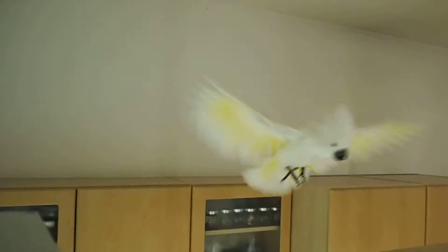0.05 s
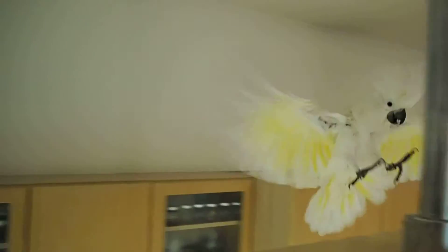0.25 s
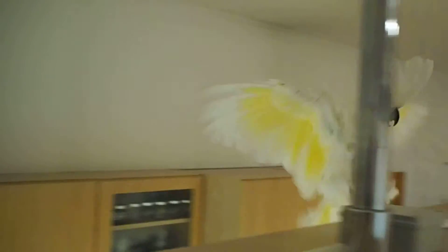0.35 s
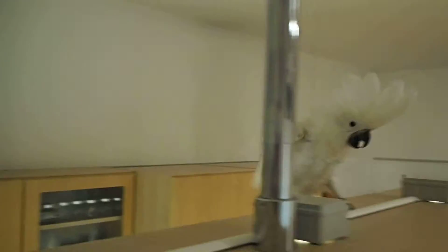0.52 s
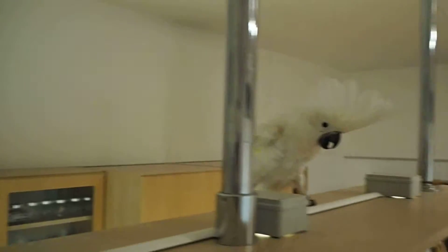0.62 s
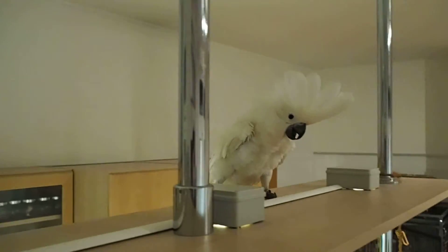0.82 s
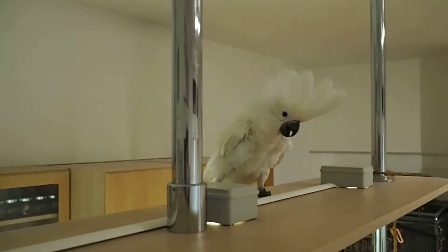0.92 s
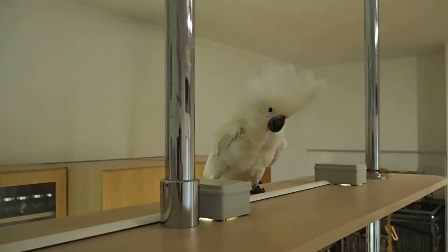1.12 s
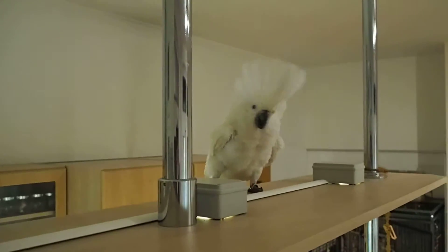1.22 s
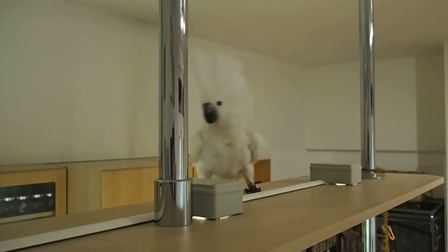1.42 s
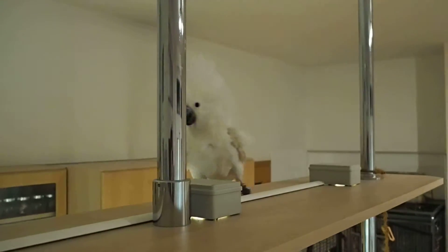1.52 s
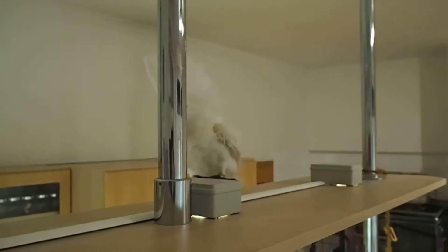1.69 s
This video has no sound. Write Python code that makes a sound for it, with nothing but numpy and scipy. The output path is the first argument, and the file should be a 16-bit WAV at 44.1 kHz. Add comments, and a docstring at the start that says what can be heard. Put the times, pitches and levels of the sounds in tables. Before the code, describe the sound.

A large parrot flaps and lands on a wooden shelf with a sharp clack, then shuffles.

```python
"""In a bare room, a large parrot brakes with a few wingbeats and lands on a wooden shelf close by.
Its wings swish and push puffs of air, its feet thud, and its clattering claws make the wood ring.
It then shuffles along the board, with soft steps and brushing feathers.
The room echoes over a quiet background hush; the camera's gain control turns the landing down."""
import sys
import numpy as np
from scipy import signal
from scipy.fft import rfft, irfft, next_fast_len
from scipy.io import wavfile
from scipy.ndimage import map_coordinates

SR = 44100
rng = np.random.default_rng(int(sys.argv[2]) if len(sys.argv) > 2 else 0)


def wav_record(signal):
    """Record a signal, one row per channel, as 16-bit PCM in the file named by sys.argv[1]."""
    frames = np.transpose(np.atleast_2d(signal))
    bounded = np.clip(frames, -1, 1)
    # unit amplitude maps onto the largest positive 16-bit level
    quanta = np.round(bounded * 32767).astype(np.int16)
    wavfile.write(sys.argv[1], SR, quanta)


N = 77175
T = np.arange(N) / SR


def amp(db):
    return 10 ** (np.asarray(db) / 20)


def unit(x):
    return x / np.sqrt(np.mean(x ** 2) + 1e-20)


def along(points, hz):
    """Read between (frequency, value) points on a log frequency axis."""
    f, v = np.transpose(points)
    return np.interp(np.log(hz + 1), np.log(f + 1), v)


def filtered(x, response):
    """Scale each frequency in x by response(hz)."""
    size = next_fast_len(N + SR // 2)
    return irfft(rfft(x, size) * response(np.fft.rfftfreq(size, 1 / SR)), size)[..., :N]


def wobble(rate):
    """A wandering curve through `rate` random points a second."""
    return map_coordinates(rng.standard_normal(N), [T * rate], order=1)


def noise(spectrum, alike):
    """Stereo noise of average (rms) size 1; `alike` says how well left and right match."""
    def shape(hz):
        spread = np.arccos(along(alike, hz)) / 2
        return amp(along(spectrum, hz)) * [np.cos(spread), np.sin(spread)]
    mid, side = filtered(rng.standard_normal((2, N)), shape)
    return unit(np.array([mid + side, mid - side]))


def swell(peak, rise, fall):
    """A bell-shaped rise to the peak time, then a fade."""
    return np.exp(-(np.minimum(T - peak, 0) / rise) ** 2 - np.maximum(T - peak, 0) / fall)


def dying(t, fade):
    """Silent before t = 0, then falling 60 dB every `fade` seconds."""
    return (t >= 0) * np.exp(-np.log(1000) * np.maximum(t, 0) / fade)


def snap(gain, size=2048):
    """The most sudden click (minimum phase) with the tone gain(hz) and energy 1."""
    cepstrum = irfft(np.log(np.maximum(gain(np.fft.rfftfreq(size, 1 / SR)), 1e-6)))
    cepstrum[1:size // 2] *= 2
    cepstrum[size // 2 + 1:] = 0
    click = irfft(np.exp(rfft(cepstrum)))
    return click / np.linalg.norm(click)


# tone of the background (frequency [Hz], level [dB])
HUSH_TONE = [(20, -8.5), (60, -5), (110, -3.5), (200, -5), (300, -9), (550, -10.5), (900, -14.5),
             (1400, -20), (2200, -19), (3800, -22), (5500, -26.5), (8000, -24), (11000, -31.5),
             (13500, -35.5), (15500, -42)]
# how well its left and right match (frequency [Hz], likeness [0-1])
HUSH_ALIKE = [(50, 0.68), (500, 0.52), (2000, 0.32), (8000, 0.1)]
def hush():
    """The room's quiet, steady background noise."""
    return amp(-52.5) * noise(HUSH_TONE, HUSH_ALIKE)


# how well left and right match for nearby sounds (frequency [Hz], likeness [0-1])
CLOSE_ALIKE = [(100, 1), (1000, 0.98), (4000, 0.8), (8000, 0.48), (13000, 0.13)]
def rubbing(spectrum, grain_db, clump_db):
    """Feathers or claws rub: fine grains of noise that come in clumps."""
    hiss = noise(spectrum, CLOSE_ALIKE)
    return unit(hiss * amp(grain_db * wobble(2500) + clump_db * wobble(220)))


# wing strokes (peak time [s], swish level [dB], air level [dB], rise [s], fall [s])
WING_STROKES = [(.005, -37.5, -80, .03, 0.021), (0.052, -36.5, -37.5, 0.024, 0.042),
                (0.17, -38.5, -53, 0.044, 0.057), (0.23, -35, -36.5, 0.032, 0.039),
                (.322, -44, -56, 0.024, 0.049)]
# tone of the swishing feathers (frequency [Hz], level [dB])
SWISH_TONE = [(180, -83), (300, -6), (384, -11), (431, -8), (769, -18), (1020, -10), (1370, -15.5),
              (2880, -10), (4880, -13), (8560, -12), (15500, -23.5)]
# tone of the pushed air (frequency [Hz], level [dB])
AIR_TONE = [(20, -19), (65, -12), (110, 0), (200, 0), (450, -6.5), (900, -14.5), (2000, -75)]
def wings():
    """Each stroke swishes and pushes a puff of air; a quill squeaks once."""
    swish = sum(amp(db) * swell(s, rise, fall) for s, db, _, rise, fall in WING_STROKES)
    push = sum(amp(db) * swell(s, rise, fall) for s, _, db, rise, fall in WING_STROKES)
    quill_hz = 3600
    quill = np.sin(2 * np.pi * quill_hz * T + 0.9 * wobble(380))
    squeak = amp(-31) * swell(peak=0.02, rise=0.0026, fall=0.0026) * quill
    feathers = rubbing(SWISH_TONE, grain_db=2.5, clump_db=1.3)
    return swish * feathers + push * noise(AIR_TONE, CLOSE_ALIKE) + squeak


# tone of the echo (frequency [Hz], level [dB])
ECHO_TONE = [(100, -8.5), (260, 0), (400, -6.5), (600, -1), (800, 2), (1200, -6), (1800, -4), (2700, -5.5),
             (3600, -2), (5000, -4.5), (8000, -2.5), (14000, -1.5)]
# how well its left and right match (frequency [Hz], likeness [0-1])
ECHO_ALIKE = [(100, 1), (700, 0.99), (2000, 0.78), (4000, 0.64), (8000, 0.12)]
# how long it lasts (frequency [Hz], time to fade 60 dB [s])
ECHO_FADE = [(100, 0.54), (500, 0.82), (2000, 0.63), (4000, 0.61), (8000, 0.55), (14000, 0.36)]
def echo(x):
    """The bare walls return a wash of sound whose highest notes die first."""
    build_s = 0.0091
    hz, t, bands = signal.stft(noise(ECHO_TONE, ECHO_ALIKE), SR, nperseg=256)
    fading = bands * dying(t, along(ECHO_FADE, hz)[:, None])
    tail = signal.istft(fading, SR, nperseg=256)[1][:, :N]
    tail *= 1 - np.exp(-T / build_s)
    return signal.fftconvolve(x.mean(0)[None], tail / np.linalg.norm(tail[0]), axes=1)[:, :N]


# low thumps (time [s], level [dB], pitch [Hz], rise and fall [s])
LOW_THUMPS = [(0.04, -46, 68.4, 0.025), (0.218, -38.5, 61.4, 0.016), (0.774, -49, 62, .03),
              (1.172, -52, 90, 0.012), (1.261, -50.5, 80.5, 0.021), (1.382, -48, 98, 0.0084)]
def thumps():
    """Moving air and the bird's weight each make a few slow waves of pressure."""
    out = np.zeros(N)
    for s, db, hz, width in LOW_THUMPS:
        t = T - s
        out += amp(db) * np.exp(-(t / width) ** 2) * np.sin(2 * np.pi * (hz * t + rng.random()))
    return out


# tone of the rumbling shelf (frequency [Hz], level [dB])
RUMBLE_TONE = [(20, -29), (55, 1.5), (150, -3), (260, -2), (500, -35)]
def shelf_rumble():
    """The shelving rumbles under the bird's weight."""
    return amp(-43.5) * swell(peak=0.49, rise=0.093, fall=0.23) * noise(RUMBLE_TONE, CLOSE_ALIKE)


# feet meeting the board (time [s], level [dB], pitch [Hz])
FOOTSTEPS = [(.3672, -19.5, 773), (.858, -44, 513), (.979, -40.5, 557), (1.024, -44.5, 1100),
             (1.171, -43, 500), (1.308, -44.5, 1250), (1.429, -47.5, 495)]
def steps():
    """Soft foot pads make a dull knock with a little scuff."""
    fade_cycles, rise_s = 16.3, 0.0021
    out = np.zeros((2, N))
    for s, db, hz in FOOTSTEPS:
        t = T - s
        scuff = noise([(hz / 10, -10), (hz, 0), (hz * 2, -12), (hz * 10, -35)], CLOSE_ALIKE)
        press = dying(t, fade_cycles / hz) * np.clip(t / rise_s, 0, 1)
        out += amp(db) * press * (np.sin(2 * np.pi * hz * t) + amp(-0.5) * scuff)
    return out


# claws striking the board (time [s], level [dB], dulled above [Hz])
CLAW_HITS = [(.3718, -5, 9000), (.3752, -7, 7100), (.379, -3, 4600), (0.3815, -4.5, 8100), (.3859, 4, 3530)]
# notes the shelf rings with (pitch [Hz], level [dB], time to fade 60 dB [s])
SHELF_NOTES = [(430, -13.5, 0.032), (787.5, -13.5, 0.075), (860, -29, 0.025), (980, -23, .04),
               (1048, -13, 0.07), (1530, -18, 0.054), (1780, -23, 0.039), (1897, -7.5, 0.06),
               (1936, -9, 0.068), (2280, -28, 0.11), (2420, -9, 0.069), (2653, -0.5, 0.039),
               (2760, -6.5, 0.085), (3050, -14, .05), (3260, -12.5, 0.085), (3462, -5.5, 0.025),
               (4045, -10.5, 0.033)]
# tone of claw on wood (frequency [Hz], level [dB])
CLAW_TONE = [(100, -26.5), (380, -12), (600, -12), (850, -9), (1350, -13.5), (1800, 2), (2200, -3),
             (2700, 1), (3100, -2), (3600, -3.5), (4200, -4), (5200, -11), (8000, -9), (11000, -14),
             (13000, -23), (15500, -21)]
def claws():
    """The claws hit in quick succession and skid; each blow cracks, rings the shelf and echoes."""
    skid_at_s, skid_width_s, echo_db = 0.380, 0.0084, 2
    slide = np.exp(-((T - skid_at_s) / skid_width_s) ** 4)
    skid = amp(-19) * slide * rubbing(CLAW_TONE, grain_db=3, clump_db=1.5)
    out = skid + amp(echo_db) * echo(skid)
    for s, db, dull_hz in CLAW_HITS:
        t = T - s
        soften = lambda hz: 1 / np.sqrt(1 + (hz / dull_hz) ** 4)
        ring = np.zeros(N)
        for hz, note_db, fade in SHELF_NOTES:
            strength = amp(note_db - 14 + rng.standard_normal()) * soften(hz)
            ring += strength * dying(t, fade) * np.sin(2 * np.pi * (hz * t + rng.random()))
        contact = 0.16 * noise([(1000, 0)], CLOSE_ALIKE) * dying(t, fade=0.0047)  # a tiny scratch
        contact[:, round(s * SR)] += 0.49  # the tip's first tap
        click = snap(lambda hz: amp(along(CLAW_TONE, hz)) * soften(hz))
        crack = amp(9) * signal.fftconvolve(contact, click[None], axes=1)[:, :N]
        out += amp(db) * (crack + ring + amp(echo_db) * echo(crack + amp(-6) * ring))
    return out


# feather brushes (peak time [s], level [dB], rise [s], fall [s], treble boost [dB])
BRUSHES = [(.892, -58, 0.018, 0.057, 7.5), (.93, -51, 0.02, 0.019, -5.5), (1.005, -53.5, .02, 0.055, -21),
           (1.192, -44.5, 0.02, 0.043, 2), (1.23, -47.5, 0.033, 0.044, -0.5), (1.542, -43, 0.029, 0.034, 4),
           (1.573, -35, 0.034, 0.029, -2.5), (1.74, -69, .012, 0.014, -4)]
# tone of brushing feathers (frequency [Hz], level [dB])
BRUSH_TONE = [(600, -14.5), (1300, -17.5), (1700, -6), (2300, -1.5), (3000, -1.5), (4000, 1.5),
              (5500, -3.5), (8000, -4), (10500, -8), (12000, -11.5), (13200, -27), (15500, -25)]
def rustles():
    """Wing and tail feathers brush past each other and the board."""
    out = np.zeros((2, N))
    for s, db, rise, fall, treble_db in BRUSHES:
        rub = rubbing(BRUSH_TONE, grain_db=2.0, clump_db=1.6)
        brush = filtered(rub, lambda hz: amp(along([(3500, 0), (7000, treble_db)], hz)))
        out += amp(db) * swell(s, rise, fall) * brush
    return out


def scene():
    """The bird, the shelf, their echo and the background hush."""
    pads = steps()
    feathers = wings() + rustles()
    tail = echo(amp(-4.5) * feathers + amp(-6) * pads)
    return claws() + pads + feathers + thumps() + shelf_rumble() + tail + hush()


def record(dry):
    """Gain control dips fast and recovers slowly; peaks are rounded and the highest treble is cut."""
    threshold_db, share, react_s, recover_db_per_s = -18, 0.97, 0.0055, 75
    ceiling, top_hz = 0.93, 15900
    k = np.exp(-1 / (react_s * SR))
    smooth = lambda x: signal.lfilter([1 - k], [1, -k], x)
    level_db = 10 * np.log10(smooth(np.mean(dry ** 2, 0)) + 1e-12)
    excess_db = share * np.maximum(level_db - threshold_db, 0)
    recovery_db = recover_db_per_s * T
    dip_db = np.maximum.accumulate(excess_db + recovery_db) - recovery_db
    ducked = dry * amp(-smooth(dip_db))
    rounded = ducked / (1 + (ducked / ceiling) ** 8) ** (1 / 8)
    return filtered(rounded, lambda hz: hz < top_hz)


dry = scene()
out = record(dry)
wav_record(out)
```